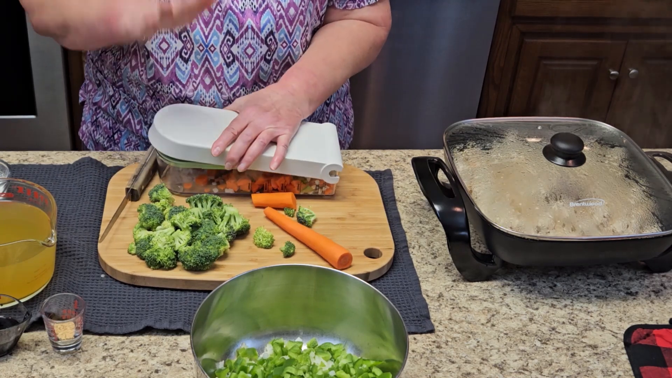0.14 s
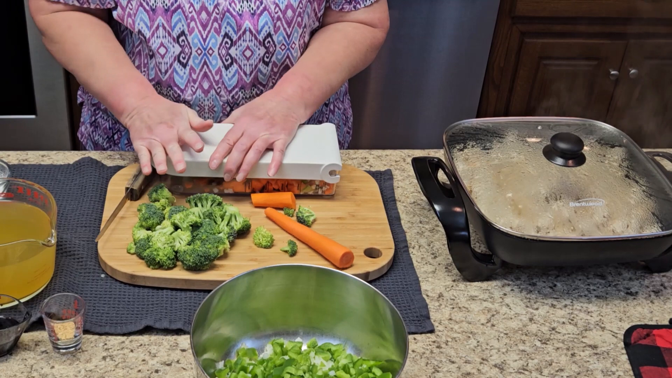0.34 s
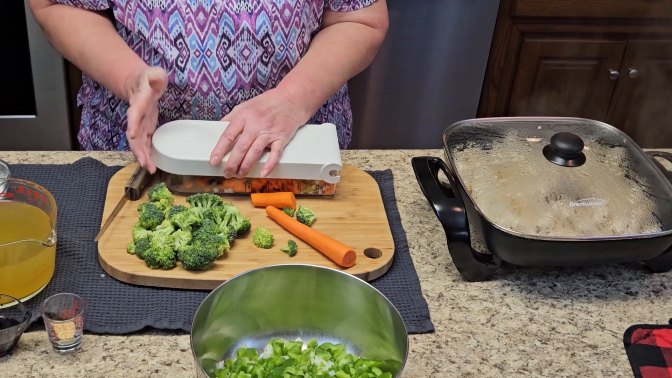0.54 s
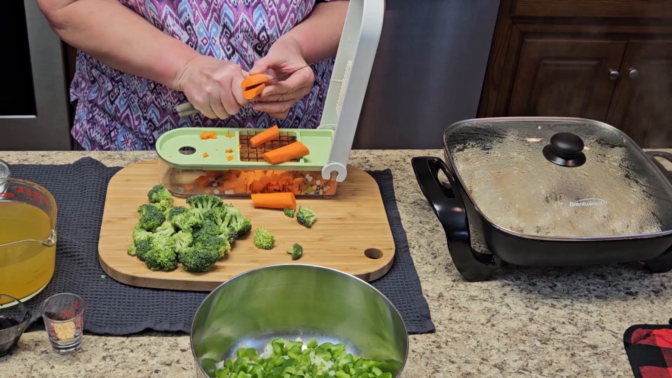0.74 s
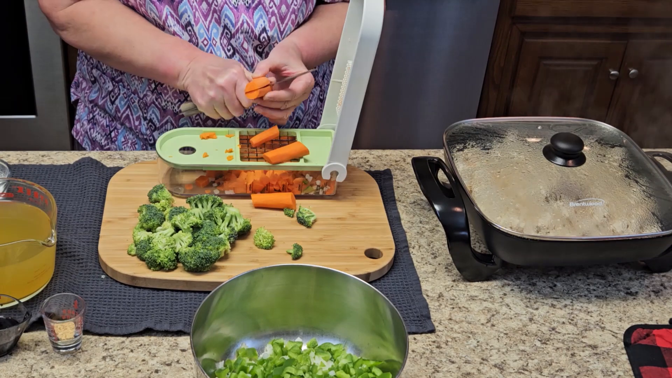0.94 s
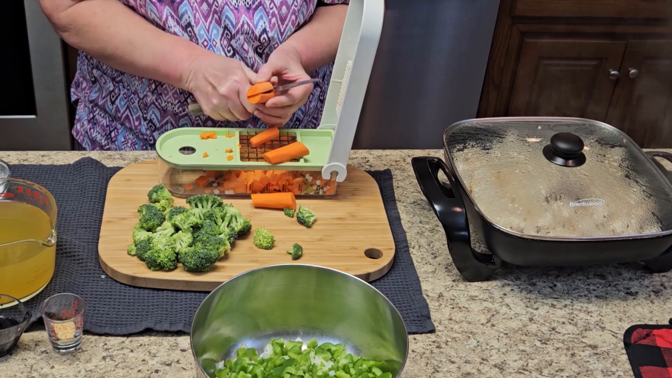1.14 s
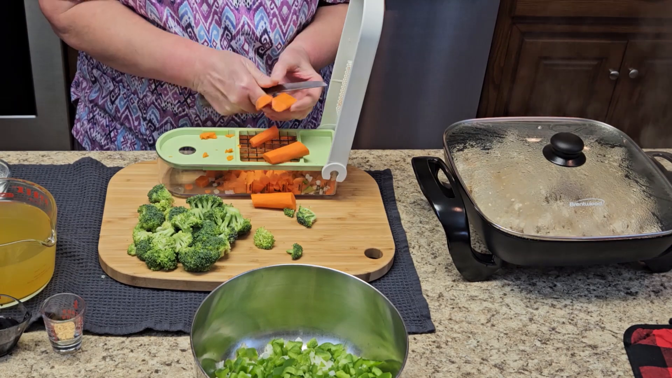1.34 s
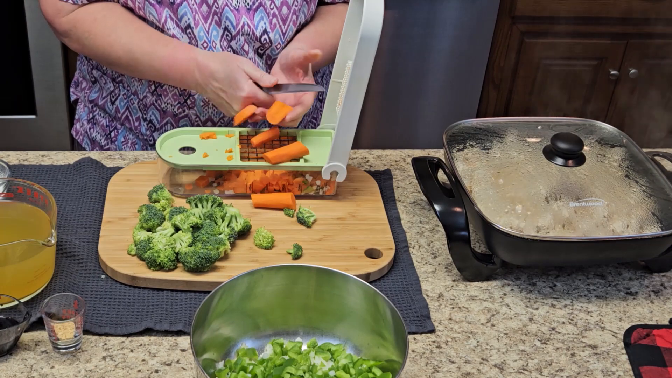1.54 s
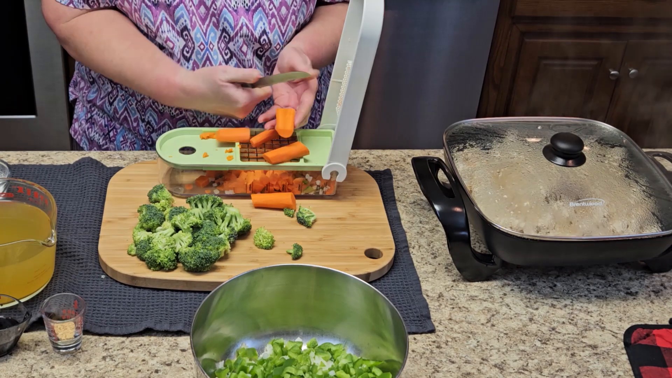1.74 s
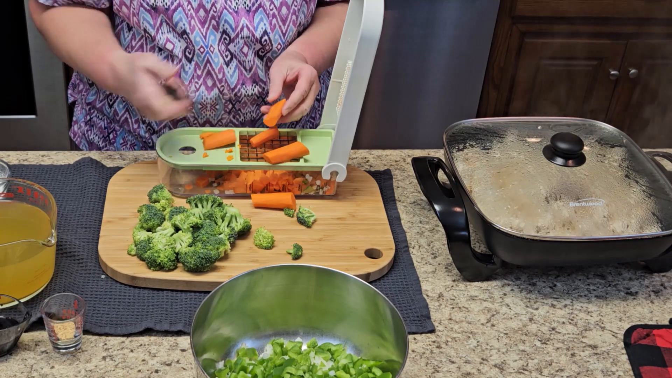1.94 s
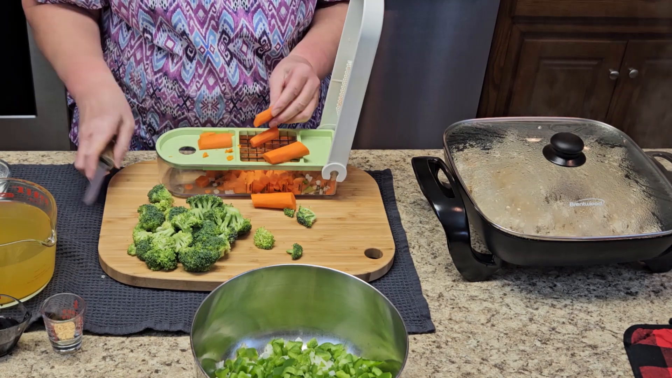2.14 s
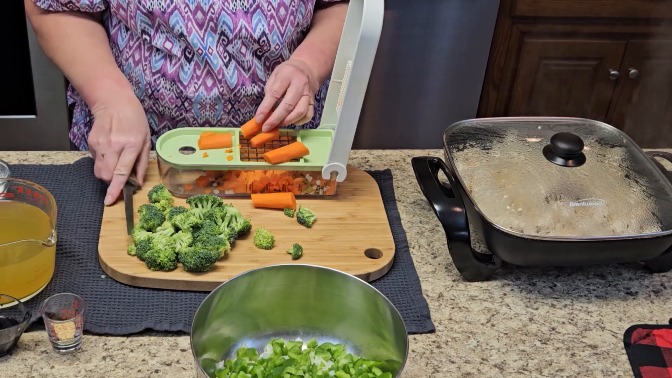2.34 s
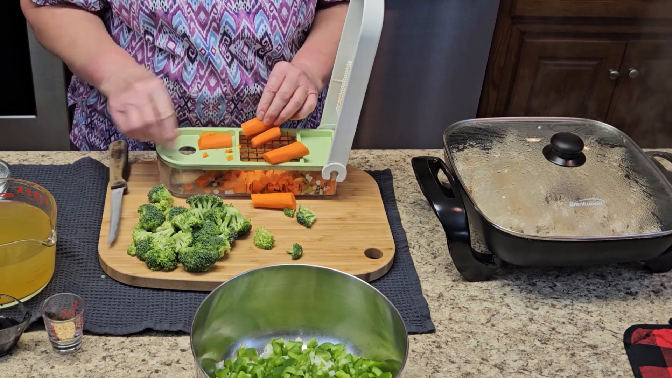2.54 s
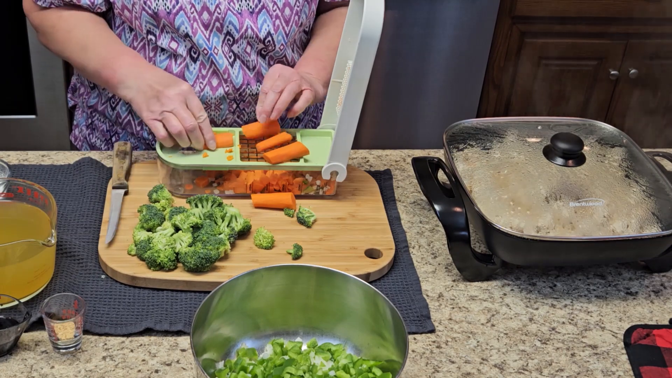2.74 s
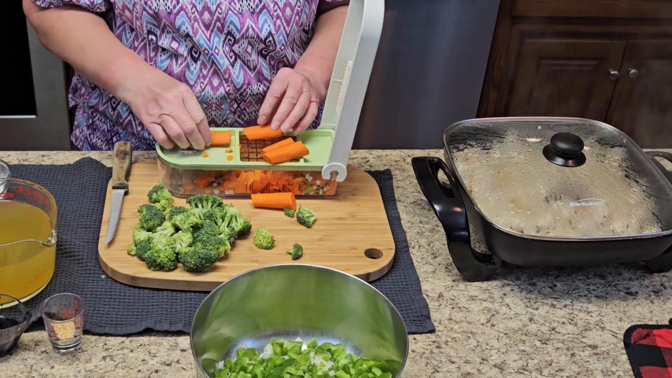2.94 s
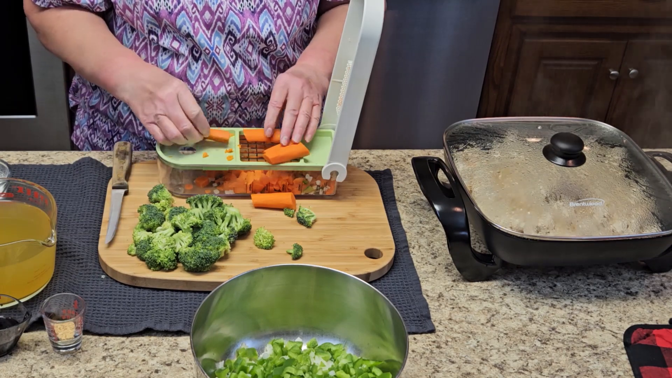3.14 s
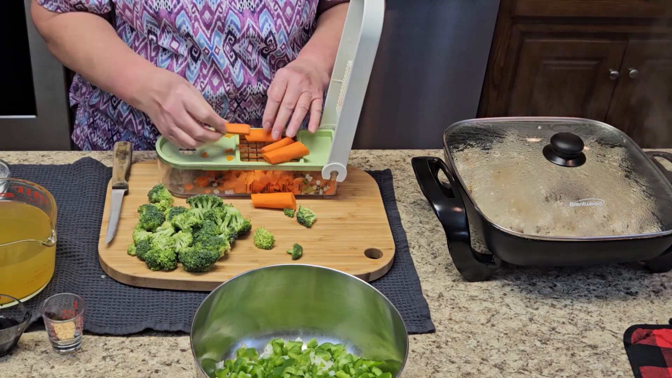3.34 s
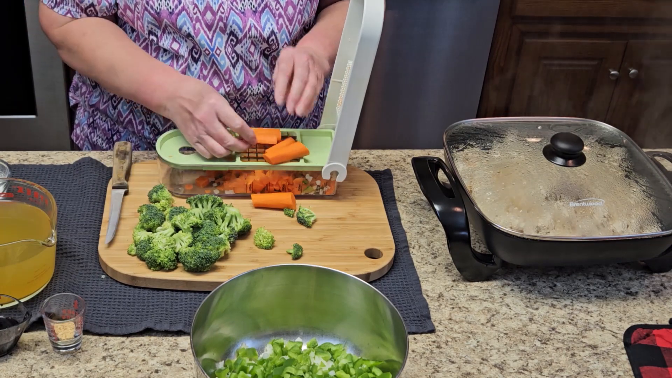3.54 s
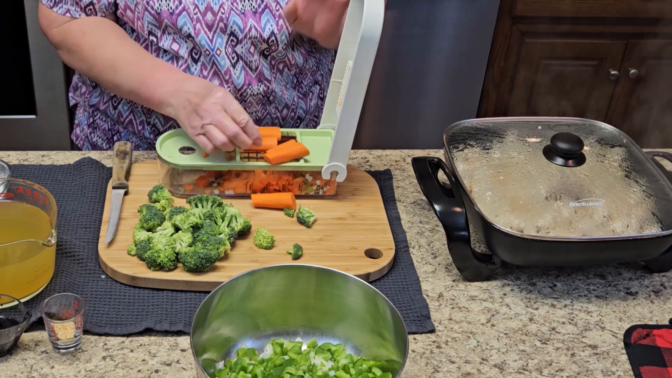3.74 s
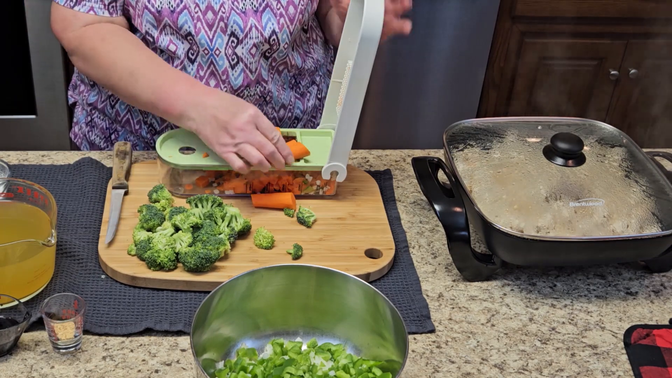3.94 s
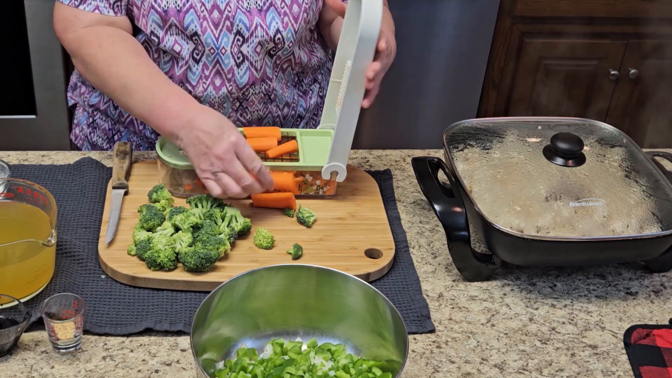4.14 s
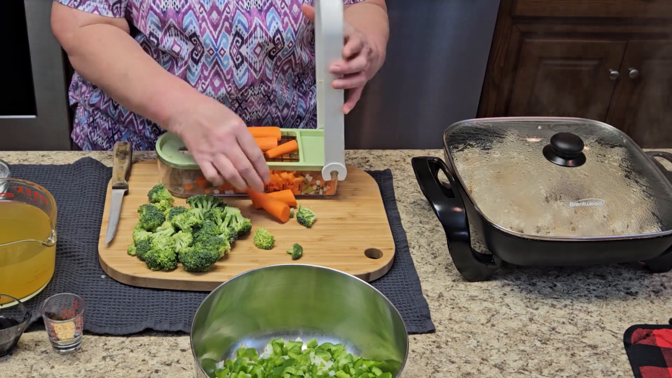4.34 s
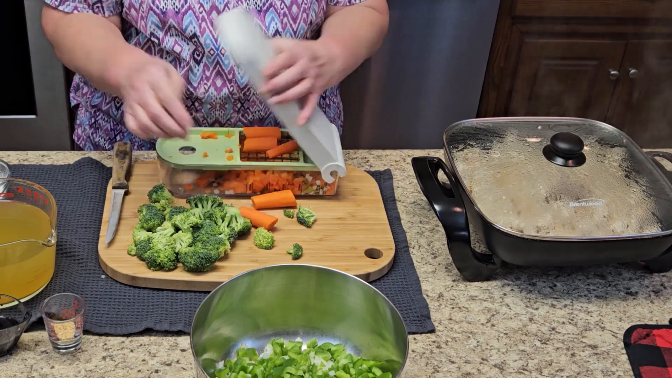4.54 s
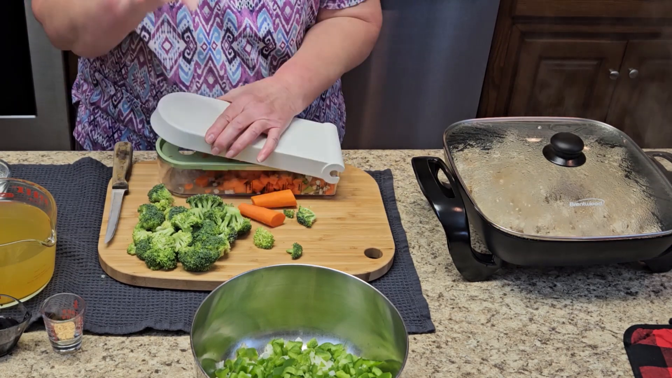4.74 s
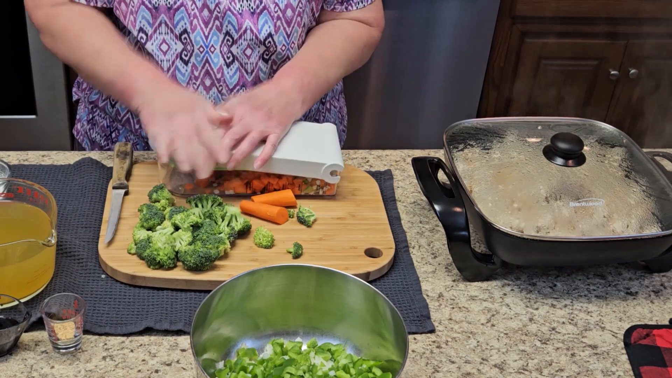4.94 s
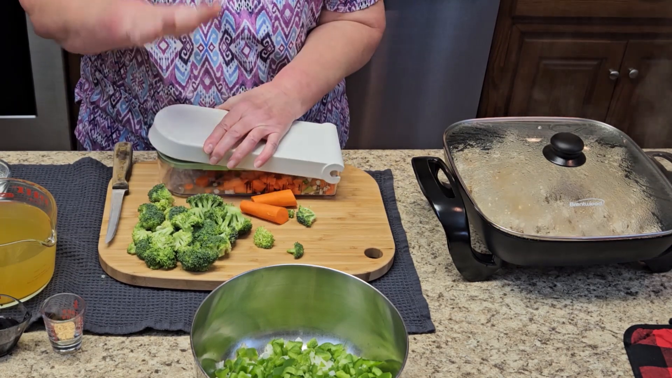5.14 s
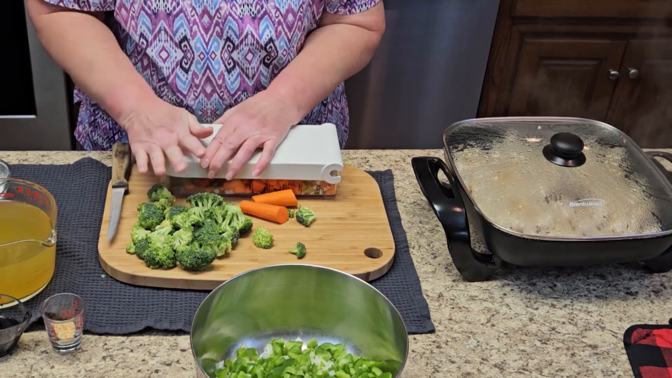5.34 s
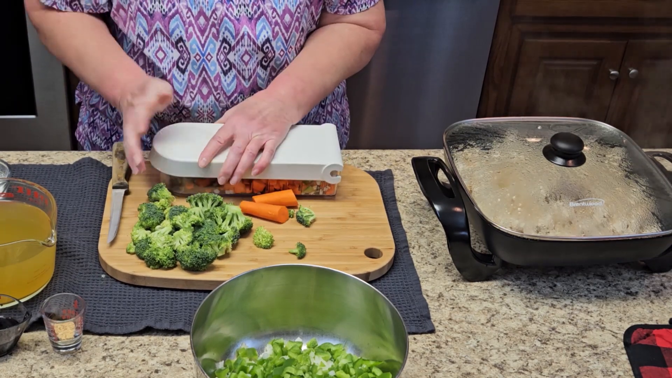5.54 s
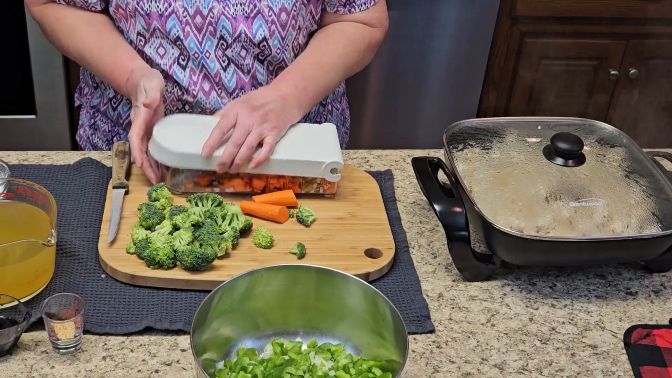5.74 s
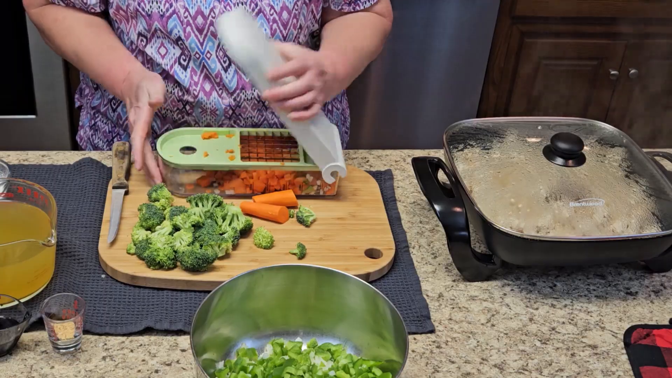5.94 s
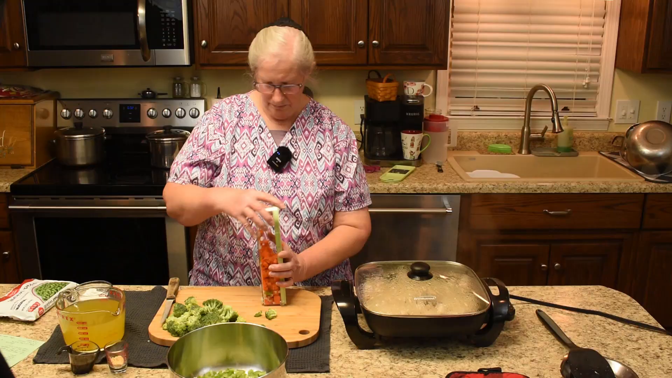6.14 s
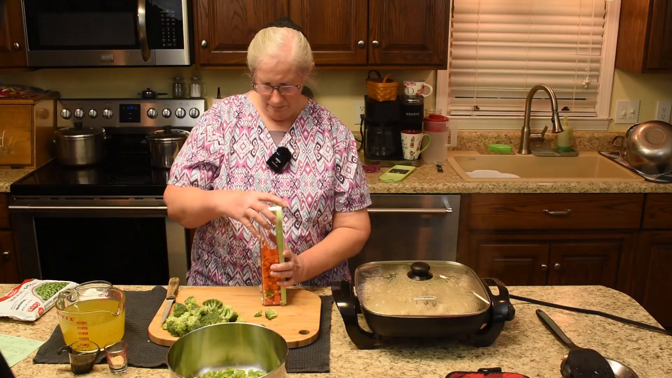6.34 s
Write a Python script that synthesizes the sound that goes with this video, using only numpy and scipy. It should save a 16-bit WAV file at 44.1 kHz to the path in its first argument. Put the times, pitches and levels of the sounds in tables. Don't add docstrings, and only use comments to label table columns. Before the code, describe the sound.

Loud plastic lid slams open and close the scene; between them carrot chunks tap, a knife clatters onto a board, and a fridge drones softly.

```python
import sys
import numpy as np
from scipy import signal
from scipy.fft import rfft, irfft, next_fast_len
from scipy.io import wavfile

SR = 44100
rng = np.random.default_rng(int(sys.argv[2]) if len(sys.argv) > 2 else 0)


def boost_factor(decibels):
    exponent = np.asarray(decibels, float) / 20
    return 10 ** exponent


def transcribe(signal):
    frames = np.atleast_2d(signal).T
    limited = np.clip(frames, -1, 1)
    pcm = np.round(limited * 32767).astype(np.int16)
    wavfile.write(sys.argv[1], SR, pcm)


N = 281358
RUN_IN = SR // 4
LONG = N + RUN_IN


def rms_one(x):
    return x / np.sqrt(np.mean(x ** 2) + 1e-20)


def at_hz(points, hz):
    points_hz, values = np.array(points).T
    return np.interp(np.log(hz), np.log(points_hz), values)


def band_pass(x, order, band_hz):
    return signal.sosfilt(signal.butter(order, band_hz, "band", fs=SR, output="sos"), x)


def ring(clicks, hz, t60):
    r, w = boost_factor(-60 / (t60 * SR)), 2 * np.pi * hz / SR
    return signal.lfilter([0, np.sin(w)], [1, -2 * r * np.cos(w), r * r], clicks + 1e-18)


# [f/Hz, left-right likeness]
LIKENESS = [(60, 1), (150, 0.83), (290, .88), (640, 0.57), (1400, 0.0099), (3100, 0.012), (15000, 0.029)]


def stereo_noise(length, spectrum):
    hz = np.maximum(np.fft.rfftfreq(length, 1 / SR), 1)
    mid, side = rfft(rng.standard_normal((2, length))) * boost_factor(at_hz(spectrum, hz))
    alike = np.clip(at_hz(LIKENESS, hz), -1, 1)
    return irfft(np.sqrt(1 + alike) * mid + np.sqrt(1 - alike) * side * [[1], [-1]], length)


def strokes(rows):
    t, gains = np.arange(N) / SR, np.zeros((len(rows[0]) - 3, N))
    for s, rise_s, fall_s, *levels_db in rows:
        on = slice(max(round((s - 2 * rise_s) * SR), 0), round((s + 2 * fall_s) * SR))
        away = np.maximum((s - t[on]) / rise_s, (t[on] - s) / fall_s)
        gains[:, on] += boost_factor(np.array(levels_db)[:, None] - 27.5 * away)
    return gains


def handling(rows, band_hz):
    lumps = boost_factor(2.6 * np.repeat(rng.standard_normal(N // 300 + 1), 300)[:N])
    return rms_one(band_pass(lumps * rng.standard_normal(N), 3, band_hz)) * strokes(rows)[0]


def contacts(rows, modes, note_db, rattle_db, crack_db, crack_s, crack_hz, thud_db, thud_hz):
    near, around, snap, thud, tap = np.zeros((5, LONG))
    clicks, cracks = np.zeros((len(modes), LONG)), np.zeros((2, LONG))
    chance = rng.standard_normal((len(rows), 4, len(modes) + 1))
    hiss = rng.standard_normal((len(rows), 2, 600)) * np.exp(-np.arange(600) / (crack_s * SR))
    for k, (s, peak_db, hz, rattle, crack, contact_s) in enumerate(rows):
        at, t = round(s * SR) + RUN_IN, np.arange(round(1.64 * contact_s * SR)) / SR
        note = boost_factor(peak_db + note_db) * np.sin(2 * np.pi * hz * t)
        near[at:at + len(t)] += note * np.sin(np.pi * (t / t[-1]) ** .6) ** 2
        around[at:at + len(t)] += note * boost_factor(5.0) * np.exp(-t / (.3 * contact_s)) * (1 - t / t[-1])
        crack_gain = boost_factor(peak_db + crack + crack_db)
        cracks[:, at:at + 600] += crack_gain * hiss[k]
        snap[at] += crack_gain * np.sqrt(crack_s * SR / 2)
        thud[at] = boost_factor(peak_db + thud_db)
        tap[at] = boost_factor(peak_db + rattle + rattle_db)
        for j, slip in enumerate(chance[k]):
            late = round(j * contact_s * SR * min(abs(slip[0]), 2) * .4)
            clicks[:, at + late] += boost_factor(peak_db + rattle + rattle_db - 1.3 * j) * slip[1:]
    thud = signal.lfilter(*signal.butter(1, thud_hz, "high", fs=SR), ring(thud, thud_hz, 1.2 / thud_hz))
    near += thud
    around += boost_factor(-3.5) * thud
    for k, (hz, db, t60) in enumerate(modes):
        near += boost_factor(db) * ring(clicks[k], hz, t60)
        sign = (-1) ** (len(modes) - k)
        around += boost_factor(db + 10) * sign * ring(tap, hz, .5 * t60)
    bright = signal.butter(1, [1800, min(crack_hz, .45 * SR)], "band", fs=SR)
    left, right = np.array([near, np.roll(near, 4)]) + signal.lfilter(*bright, cracks)
    return np.array([left, right, around, signal.lfilter(*bright, snap)])


def touches(rows, crack_db, contact_s):
    return [(*row, row[3] + crack_db, contact_s) for row in rows]


# [f/Hz, level/dB, t60/s]
BOARD = [(423, -3.5, 0.017), (790, -3, 0.0058), (1148, -6, 0.011), (1405, 3.5, 0.025), (1933, -4, 0.026),
         (2207, -6.5, 0.013), (2788, -8, 0.011), (3640, -14.5, 0.022), (4640, -20, 0.0046),
         (5740, -27, 0.0017)]


def small_contacts(rows, crack_db, contact_s):
    return contacts(touches(rows, crack_db, contact_s), BOARD, note_db=-1.44, rattle_db=-4.0, crack_db=13.5,
                    crack_s=0.0012, crack_hz=6900, thud_db=-7.0, thud_hz=380)


def ringing(rows, modes):
    s, peak_db, _, rattle_db = np.transpose(rows)
    taps = np.zeros(LONG)
    taps[(s * SR).astype(int) + RUN_IN] = boost_factor(peak_db + .5 * rattle_db)
    return sum(boost_factor(db) * ring(taps, hz, t60) for hz, db, t60 in modes) * boost_factor([[-4], [-4], [0], [-99]])


# [f/Hz, level/dB per Hz]
AIR = [(20, -13.5), (40, -11.5), (100, -7), (135, -12), (270, -6.5), (480, -12), (900, -18.5),
       (1050, -23.5), (2500, -29.5), (6000, -35.5), (8200, -28), (9800, -37.5), (12700, -28.5),
       (16300, -37)]
# [f/Hz, width/Hz, level/dB]
HUM = [(160, 4.6, -63), (262, 13, -62.5), (7740, 200, -87.5)]


def room_tone():
    air = boost_factor(-54) * rms_one(stereo_noise(N, AIR)) * boost_factor([[-.6], [.6]])
    hum = boost_factor(-55) * np.sin(2 * np.pi * 60.5 * np.arange(N) / SR)
    for hz, width, db in HUM:
        hum += boost_factor(db) * rms_one(ring(rng.standard_normal(LONG), hz, 1.5 / width)[RUN_IN:])
    return air + hum


# [f/Hz, t60/s]
KITCHEN = [(40, 1), (120, 0.38), (300, 0.3), (700, 0.38), (1500, 0.37), (4000, 0.32), (12000, 0.25)]


def kitchen(sound, wet_db, gap_s=0.0024):
    length = SR * 3 // 4
    t, tail = np.arange(length) / SR, 0
    noise = stereo_noise(length, [(20, 0), (20000, 0)])
    edges = 30 * 2 ** np.arange(0, 9.6, .5)
    for low, high in zip(edges, edges[1:]):
        band = band_pass(noise, 2, [low, min(high, .47 * SR)])
        tail = tail + band * boost_factor(-60 * t / at_hz(KITCHEN, np.sqrt(low * high)))
    tail = signal.sosfilt(signal.butter(2, 200, "high", fs=SR, output="sos"), tail)
    tail = tail * np.clip((t - gap_s) / 0.0013, 0, 1)
    tail = boost_factor(wet_db) * tail / np.sqrt(np.sum(tail ** 2) / 2)
    size = next_fast_len(LONG + length)
    body, crack, paths = rfft(sound[2], size), rfft(sound[3], size), rfft(tail, size)
    reflected = irfft(body * paths + crack * paths[::-1], size)[:, :LONG]
    return (sound[:2] + reflected)[:, RUN_IN:] * boost_factor([[-.6], [.6]])


# [t/s, peak level/dB, hollow note
# f/Hz, rattle level/dB, crack level/dB]
LID_BLOWS = [
    (-0.11, -5.5, 230, -12.5, -12),
             (0.2071, -15, 500, -10, 1.5),
    (0.209, -1.5, 303.8, -11.5, -12),
    (0.2251, -9.5, 268.7, -3.5, 3.5),
    (4.630, -12.5, 511, -6.5, -15),
    (4.642, -14.5, 536, -4.5, -3.5),
    (4.933, -6, 394, -6.5, -13),
    (4.941, -0.5, 375, -24.5, -18.5),
    (5.2659, -1.5, 371, -17.5, -6.5),
    (5.269, 0.5, 339, -17, -19),
    (5.2904, -7.5, 262, -1.5, -5.5),
]
# [f/Hz, level/dB, t60/s]
LID = [(380, -6.5, 0.028), (490, -4, 0.06), (559, -5.5, 0.067), (655, -3.5, 0.065), (900, 1.5, 0.022),
       (1051, -2.5, 0.038), (1252, -0.5, .03), (1470, 1, 0.024), (1990, 0, .02), (2276, -3, 0.015),
       (2980, -6, 0.022), (3850, -4, 0.012)]


def lid_slams():
    palm_s = .011
    return contacts([(*row, palm_s) for row in LID_BLOWS], LID, note_db=-1.0, rattle_db=-4.5,
                    crack_db=10.0, crack_s=0.001, crack_hz=12000, thud_db=-15.0, thud_hz=250)


# [t/s, sway level/dB, drum level/dB]
SHAKES = [
    (-.11, -28, -17.5),
    (.215, -20, -16),
    (4.64, -35, -32),
    (4.946, -29, -30.5),
    (5.27, -18.5, -15),
]


def worktop():
    s, sway_db, drum_db = np.transpose(SHAKES)
    out = np.zeros(LONG)
    # levels, Hz, t60 s
    for levels_db, hz, t60 in ((sway_db - 0.5, 40, .36), (drum_db - 3.0, 108, 0.37), (sway_db - 1.5, 70, .3)):
        push = np.zeros(LONG)
        push[(s * SR).astype(int) + RUN_IN] = boost_factor(levels_db)
        out += ring(ring(push, hz, 4.0 / hz), hz, t60) * 5.5 * hz / SR
    return out[RUN_IN:]


# [t/s, peak level/dB, note f/Hz, rattle level/dB]
FINGERS = [
    (0.085, -38.5, 380, -26.5),
    (0.6, -39.5, 290, -38),
    (0.772, -56, 394.4, -7),
    (5.711, -30.5, 305, -18.5),
    (5.734, -44, 283, -21.5),
    (5.852, -36, 500, -13.5),
    (5.871, -41.5, 515, -7.5),
    (5.886, -57.5, 406, 8.5),
]


def fingers():
    return small_contacts(FINGERS, crack_db=-12.5, contact_s=0.0082)


# [peak t/s, rise t/s, fall t/s, scrape level/dB, hiss level/dB]
RUBBING = [(.203, 0.015, .003, -35.5, -41.5), (.72, .025, 0.14, -55, -42),
           (.772, 0.0034, 0.082, -46.5, -46), (3.025, .07, 0.062, -55.5, -76),
           (4.05, 0.37, 0.48, -58.5, -72), (4.075, .025, 0.26, -73.5, -49.5),
           (4.25, 0.039, 0.21, -53.5, -59), (4.622, 0.015, 0.0098, -44, -68),
           (5.264, 0.024, .003, -39, -38), (5.53, .5, 0.68, -66, -51), (5.83, 0.032, .08, -52.5, -41),
           (5.81, .004, .05, -70, -39), (1.75, .3, .25, -76, -88)]
# [f/Hz, level/dB per Hz]
RUB = [(700, -8), (1500, -12), (3500, 3), (6000, -4.5), (8000, -1.5), (13000, -9.5), (16500, -5)]


def rubbing():
    grain_db = 1.6 * np.repeat(rng.standard_normal(N // 60 + 1), 60)[:N]
    grains = rms_one(stereo_noise(N, RUB) * boost_factor(grain_db))
    scrape = signal.sosfilt(signal.butter(4, 10000, "low", fs=SR, output="sos"), grains)
    hiss = signal.sosfilt(signal.butter(4, 10000, "high", fs=SR, output="sos"), grains)
    scrape_gain, hiss_gain = strokes(RUBBING)
    return scrape * scrape_gain + hiss * hiss_gain


# [peak t/s, rise t/s, fall t/s, level/dB]
LEANING = [
    (.45, .5, .5, -57),
    (1.75, .5, 0.54, -58),
    (4.3, .5, 0.57, -57),
    (5.55, .5, 0.71, -55.5),
    (5.88, .2, 0.42, -52.5),
    (6.27, .04, .5, -32.5),
]


def leaning():
    return handling(LEANING, (75, 135))


# [t/s, peak level/dB, note f/Hz, rattle level/dB]
CARROT = [(1.627, -35.5, 457, -18.5), (1.688, -39, 558, -22), (1.736, -38.5, 430, -20),
          (1.788, -37.5, 377, -25), (1.805, -38.5, 527, -21), (1.825, -31.5, 700, -15),
          (1.874, -28.5, 720, -15), (1.987, -21.5, 738, -13.5), (1.992, -29.5, 379, -23),
          (3.001, -38, 693, -10), (3.261, -44, 326, -25), (3.45, -38.5, 340, -21), (3.643, -29, 500, -26.5)]


def carrots():
    return small_contacts(CARROT, crack_db=-14, contact_s=0.0077)


# [peak t/s, rise t/s, fall t/s, level/dB]
SCUFFS = [
    (1.64, 0.031, 0.14, -51.5),
    (1.75, .08, 0.17, -48),
    (1.83, 0.09, 0.22, -47),
    (1.885, .03, 0.18, -45.5),
    (2.0, .03, 0.18, -44),
    (3.46, 0.043, 0.38, -53.5),
    (3.655, .03, 0.18, -54),
    (5.72, 0.023, .25, -52.5),
    (5.865, 0.047, .3, -51.5),
]


def scuffs():
    return handling(SCUFFS, (303, 833))


# [t/s, peak level/dB, note f/Hz, rattle level/dB]
KNIFE = [
    (2.291, -47.5, 603, -10.5),
    (2.362, -10, 599, -9),
    (2.521, -11.5, 592, -7),
    (2.557, -17.5, 590, -18),
    (2.628, -13, 611, -7),
    (2.799, -33, 670, -25),
]
# [f/Hz, level/dB, t60/s]
BLADE = [(500, -20, .1), (1386, -10, 0.16), (1535, -15, 0.036), (1820, -11.5, 0.08), (2590, -17.5, .02),
         (3600, -22, .025)]


def knife():
    return small_contacts(KNIFE, crack_db=-23, contact_s=.010) + ringing(KNIFE, BLADE)


# [t/s, peak level/dB, note f/Hz, rattle level/dB]
HINGE = [
    (4.15, -34, 600, -7),
    (4.193, -32, 580, -6.5),
    (4.203, -33, 875, -5.5),
    (4.219, -31, 890, -5.5),
    (4.255, -30, 540, -21),
    (4.279, -37, 490, -20),
    (4.404, -23.5, 565, -24),
    (4.487, -21.5, 610, -17),
]
# [f/Hz, level/dB, t60/s]
LATCH = [(2170, -16, 0.016), (2690, -15, .035), (3480, -15.5, 0.022), (4040, -18, 0.013)]


def hinge():
    return small_contacts(HINGE, crack_db=-20, contact_s=.008) + ringing(HINGE[-2:], LATCH)


# [t/s, level/dB, f/Hz, t60/s]
BOX_RINGS = [
    (4.636, -24, 490, 0.31),
    (4.949, -11, 364.4, 0.28),
    (4.94, -16, 597, .14),
    (4.945, -20.5, 506, 0.23),
    (4.995, -17.5, 390.6, 0.25),
    (5.286, -15, 266, 0.18),
    (5.31, -20, 244.6, .2),
]


def box_air():
    out = np.zeros(LONG)
    for s, db, hz, t60 in BOX_RINGS:
        click = np.arange(LONG) == round(s * SR) + RUN_IN
        out += boost_factor(db) * ring(click, hz, t60)
    return out[RUN_IN:]


# [t/s, peak level/dB, note f/Hz, rattle level/dB]
LIFTED = [
    (6.229, -26.5, 577, -25),
    (6.238, -26.5, 830, -7),
    (6.25, -25.5, 660, -11.5),
    (6.261, -37.5, 661, -4),
    (6.276, -45.5, 605, -16),
    (6.294, -35.5, 905, -11),
    (6.308, -30, 677, -13),
    (6.334, -38, 634, -9.5),
]


def lifted_chopper():
    knocks = contacts(touches(LIFTED, crack_db=-2.5, contact_s=0.013), BOARD, note_db=-2.5, rattle_db=-3.5,
                      crack_db=3.5, crack_s=0.0089, crack_hz=5100, thud_db=8.5, thud_hz=500)
    sides = kitchen(knocks, wet_db=2.5, gap_s=0.0027)[1] * boost_factor([[-36], [6]])
    return signal.sosfilt(signal.butter(2, 6000, fs=SR, output="sos"), sides)


def scene_changes():
    t, dip = np.arange(N) / SR, 1
    changes_s, fade_out_s, fade_in_s = (0.689, 6.218), 0.05, 0.035
    for s in changes_s:
        away = np.maximum((s - t) / fade_out_s, (t - s) / fade_in_s)
        dip = dip * np.clip(away, .001, 1) ** 1.65
    first = np.select([t < changes_s[0], t < changes_s[1]], [boost_factor(2), 1], boost_factor(-28))
    second = (t > changes_s[1]) * boost_factor(-58 * np.maximum(t - changes_s[1] - fade_in_s, 0))
    return dip * first, dip * second


def scene():
    small = fingers() + carrots() + knife() + hinge()
    first = room_tone() + kitchen(lid_slams(), wet_db=1.0) + kitchen(small, wet_db=2.5)
    first = first + worktop() + box_air() + rubbing() + leaning() + scuffs()
    first_gain, second_gain = scene_changes()
    return first * first_gain + lifted_chopper() * second_gain


def low_pass(x):
    return signal.sosfilt(signal.butter(12, 16410, fs=SR, output="sos"), x)


def record(dry):
    b, a = signal.iirnotch(9900, 3.0, fs=SR)
    coloured = 0.26 * dry + 0.75 * signal.lfilter(b, a, dry)
    rounded = 1.19 * np.tanh(coloured / 1.483)
    mix = signal.sosfilt(signal.cheby2(20, 60, 16100, fs=SR, output="sos"), rounded)
    return low_pass(mix)


dry = scene()
out = record(dry)
transcribe(out)
```